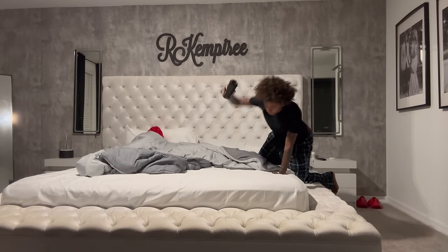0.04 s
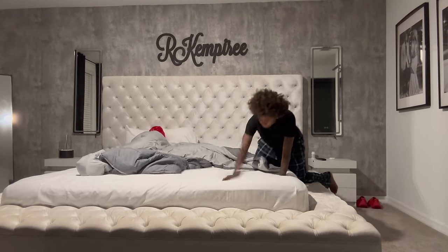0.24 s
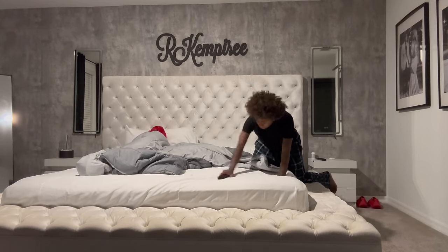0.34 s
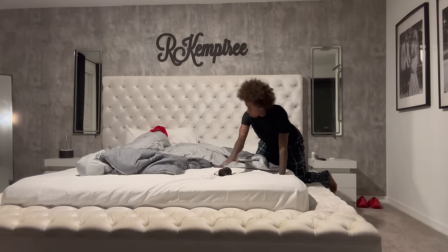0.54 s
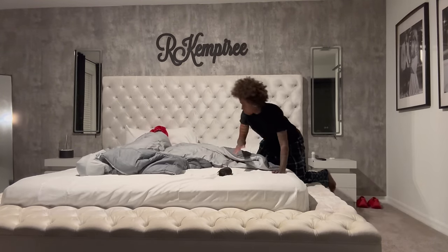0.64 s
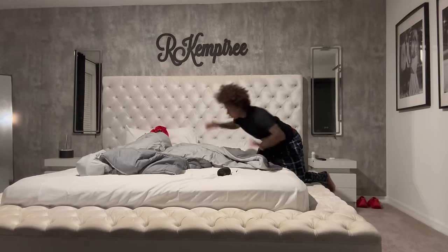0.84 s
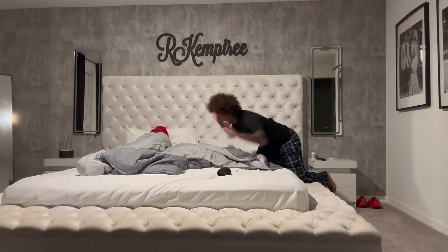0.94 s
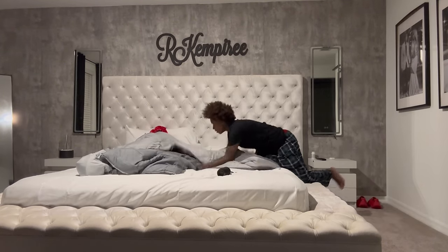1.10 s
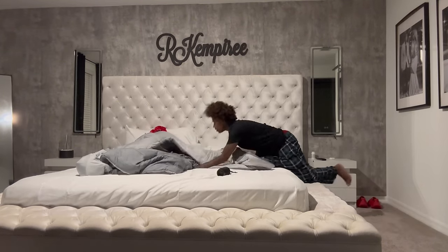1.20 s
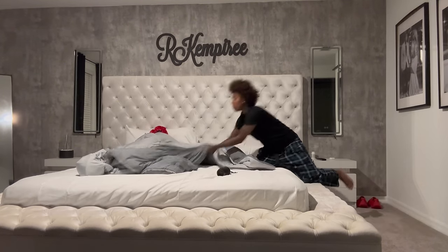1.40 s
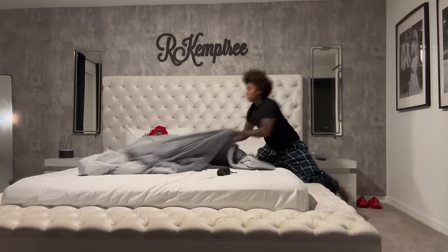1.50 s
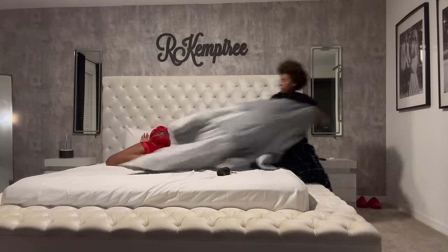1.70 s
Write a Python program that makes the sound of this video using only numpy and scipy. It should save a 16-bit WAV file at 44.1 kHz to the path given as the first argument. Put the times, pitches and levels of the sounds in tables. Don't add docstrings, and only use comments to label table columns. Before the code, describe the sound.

A small hard object slams onto a mattress with a loud low boom and puff of air, then a softer hand slap and knee thuds, then a comforter rustles as it is pulled, in a quiet bedroom, phone microphone.

```python
import sys
import numpy as np
from scipy import signal
from scipy.fft import rfft, irfft, next_fast_len
from scipy.io import wavfile
from scipy.ndimage import uniform_filter1d

SR = 44100
rng = np.random.default_rng(int(sys.argv[2]) if len(sys.argv) > 2 else 0)


def decibels_to_gain(level_db):
    exponent = np.asarray(level_db, float) / 20
    return 10 ** exponent


def materialize(psi):
    bounded = np.clip(np.atleast_2d(psi).T, -1, 1)
    quanta = np.round(bounded * 32767).astype(np.int16)
    wavfile.write(sys.argv[1], SR, quanta)


N = 77175


def evened(x):
    return x / np.sqrt(np.mean(x ** 2) + 1e-20)


def read(points, hz):
    f, value = np.transpose(points)
    return np.interp(np.log(hz + 1), np.log(f + 1), value)


def steady(t, hz):
    return 1


def noise(colour, level, tilt_db=0., patchy_db=2.5):
    frames, hz = N // 64 + 5, np.fft.rfftfreq(256, 1 / SR)[:, None]
    a, b, patches = rng.standard_normal((frames, 129, 2, 3)).T
    patches = uniform_filter1d(patches[0], size=4, axis=0)
    patches = evened(uniform_filter1d(patches, size=14, axis=1))
    t = np.arange(frames) * 64 / SR
    z = (a + 1j * b) * decibels_to_gain(patchy_db * patches) * level(t, hz)
    x = signal.istft(z, nperseg=256, noverlap=192)[1][:, :N] / np.sqrt(96)
    fine = np.fft.rfftfreq(N, 1 / SR)
    tilt = tilt_db * np.log2(np.clip(fine, 400, None) / 1000)
    shape = decibels_to_gain(read(colour, fine) + tilt)
    return irfft(rfft(x) * evened(shape), N)


# (frequency [Hz], level [dB])
HUSH_COLOUR = [(25, -11.5), (60, -7), (110, -15), (220, -23.5), (330, -21.5), (900, -32.5), (2500, -39.5),
               (15800, -60)]


def hush():
    return decibels_to_gain(-57) * noise(HUSH_COLOUR, steady, patchy_db=0.5)


# (frequency [Hz], level [dB])
CLOTH_COLOUR = [(50, -25.5), (130, -3.5), (480, -5.5), (900, -13), (1600, -15.5), (2700, -27.5),
                (8000, -28), (15800, -41.5)]
# (time [s], level [dB], rise [s], time to fall 60 dB [s], tilt [dB/octave])
FLICKS = [(-.02, -63.5, .01, 0.73, 1.5), (0.072, -51.5, 0.0011, 0.3, 1), (.125, -69, 0.0049, 0.093, -4),
          (0.172, -60, 0.073, 0.22, 1.5), (0.227, -36, .008, .1, 7.5), (0.411, -58.5, 0.023, 0.44, -0.5),
          (.49, -54, .02, 0.22, -1.5), (.984, -67.5, 0.0017, 0.91, 4), (1.034, -47, 0.0028, 0.082, -2),
          (1.301, -50.5, 0.012, .3, 1), (1.322, -43, 0.0087, 0.26, -1), (1.61, -47, 0.034, 0.17, 1.5),
          (1.73, -69.5, .015, .2, -1.5)]
# (time [s], level [dB])
DRAG = [
    (1.34, -71),
    (1.4, -64),
    (1.51, -54),
    (1.604, -53),
    (1.622, -52),
    (1.674, -57),
    (1.75, -57.5),
]


def cloth():
    t = np.arange(N) / SR
    grains_per_s, grain_db, grain_share = 340, -2.5, 0.13
    grains = decibels_to_gain(grain_db * rng.exponential(1, N)) * (rng.random(N) < grains_per_s / SR)
    grains = signal.oaconvolve(grains, np.exp(-np.arange(200) / 40))[:N]
    rough = 1 - grain_share + grain_share * evened(grains)

    s, db = np.transpose(DRAG)
    fade_in = np.clip((t - s[0]) / 0.0526, 0, 1)
    out = decibels_to_gain(np.interp(t, s, db) + 8.5) * fade_in * noise(CLOTH_COLOUR, steady)

    dull = evened(noise(CLOTH_COLOUR, steady, tilt_db=-1.))
    bright = evened(noise(CLOTH_COLOUR, steady, tilt_db=4.))
    for start, db, rise, t60, tilt in FLICKS:
        u = np.maximum(t - start, 0)
        share = np.clip((tilt + 1) / 5, 0, 1)
        shape = np.minimum(u / rise, 1) * decibels_to_gain(db - 60 * np.maximum(u - rise, 0) / t60)
        out = out + shape * ((1 - share) * dull + share * bright)
    return rough * out


# (time [s], frequency [Hz], length [s])
SEAMS = [(.074, 7800, .012), (.075, 1200, .016), (.088, 4200, .014), (.125, 1350, .03), (.66, 340, .28),
         (1.305, 3900, .045), (1.328, 2200, .02), (1.47, 3750, .11), (1.495, 2200, .07), (1.5, 1500, .07),
         (1.615, 1400, .03)]
SEAM_LEVELS = [-63.5, -57.5, -66, -57, -61, -63.5, -59, -62, -56.5, -56, -55.5]


def seams():
    t, out = np.arange(N) / SR, np.zeros((2, N))
    width_hz = 260
    r = np.exp(-np.pi * width_hz / SR)
    for (start, hz, length), db in zip(SEAMS, SEAM_LEVELS):
        hiss = rng.standard_normal((2, N)) + 1j * rng.standard_normal((2, N))
        slow = signal.lfilter([1], [1, -2 * r, r * r], hiss)
        whistle = (slow * np.exp(2j * np.pi * hz * t)).real
        arch = np.sin(np.pi * np.clip((t - start) / length, 0, 1) ** .5)
        out += decibels_to_gain(db) * arch * evened(whistle)
    return out


def struck(hits, modes, contact_s):
    t, out = np.arange(SR // 2) / SR, np.zeros(N + 2 * SR)
    settle_db, settle_s = -10, 0.018
    push = np.hanning(int(contact_s * SR) + 3)
    fade = np.exp(-t[:SR // 8] / settle_s) * decibels_to_gain(settle_db) / np.sqrt(settle_s * SR / 2)
    shiver = rng.standard_normal((len(hits), SR // 8)) * fade
    shiver[:, 0] = 1
    for (s, db, *pitch), drive in zip(hits, shiver):
        factor = pitch[0] if pitch else 1
        ring = np.zeros(len(t))
        for k, (hz, level_db, t60) in enumerate(modes):
            tone = decibels_to_gain(level_db - 60 * t / t60) * np.sin(2 * np.pi * hz * factor * t)
            ring += (-1) ** k * tone
        ring = signal.fftconvolve(np.convolve(ring, push / push.sum()), drive)
        out[round(s * SR):][:len(ring)] += decibels_to_gain(db) * ring
    return out[:N]


# (frequency [Hz], time to fall 60 dB [s])
ROOM = [(60, 0.57), (200, 0.35), (500, 0.36), (1000, 0.36), (2000, 0.4), (5000, 0.39), (11000, 0.37)]


def dying(t, hz):
    return decibels_to_gain(-60 * t / read(ROOM, hz))


def burst(start, db, rise_s, colour, crack_db):
    def level(t, hz):
        u = np.maximum(t - start, 0)
        crack = 1 + decibels_to_gain(crack_db) * np.exp(-u / 0.036)
        return (t > start - .02) * dying(u, hz) * crack
    gate = np.clip((np.arange(N) / SR - start) / rise_s, 0, 1)
    return decibels_to_gain(db) * gate * noise(colour, level)


# (time [s], level [dB])
SLAM = [
    (0.2385, -4),
    (0.2445, 5),
    (0.2555, -15.5),
]
# (frequency [Hz], level [dB], time to fall 60 dB [s])
BED = [(45.7, -15, .5), (66.3, -10, .4), (86.6, 3, 0.14), (119.4, -17.5, 0.19), (142.17, -9.5, .5),
       (205, -3, 0.12), (302.5, -3.5, 0.11), (359.4, -17.5, 0.23), (506.5, -11.5, 0.29), (583, 0.5, 0.069),
       (711, -6.5, 0.09), (762, 1.5, .12), (823, -18.5, 0.2), (1318, -9, 0.067)]
# (frequency [Hz], level [dB])
SLAM_AIR = [(40, -5), (90, -0.5), (700, -16), (1000, -24.5), (1400, -22.5), (4000, -36), (9000, -44.5),
            (15800, -70.5)]


def slam():
    boom = decibels_to_gain(-12) * struck(SLAM, BED, contact_s=0.0004)
    puff = burst(SLAM[0][0], -14.5, 0.00067, SLAM_AIR, crack_db=1)
    return boom, puff


def room(x):
    taps = np.zeros((2, SR // 2))
    slots = np.arange(160, SR // 2 - 20, 20)
    at = slots + rng.integers(0, 20, (2, len(slots)))
    np.put_along_axis(taps, at, rng.choice([-1., 1.], at.shape), 1)
    hz, t, z = signal.stft(taps, SR, nperseg=512)
    tail = signal.istft(z * dying(t, hz[:, None]), SR, nperseg=512)[1]
    return signal.fftconvolve(x[None], tail / np.linalg.norm(tail[0]), axes=1)[:, :N]


# (time [s], level [dB], pitch factor [ratio])
KNEES = [(.43, -33.5, 0.94), (.5, -48.5, 1.213), (.692, -44, 1.24), (.722, -48, 0.936), (.785, -55, 1.13),
         (.93, -56, 1.06), (1.078, -17, 1), (1.103, -22, 1), (1.15, -22, 0.785), (1.19, -37.5, 0.81),
         (1.255, -52, 0.89), (1.345, -37, 1.2), (1.4, -40, 1), (1.5, -40.5, 1.06), (1.62, -34, 0.91),
         (1.664, -25.5, 0.81), (1.685, -28, 0.83), (1.727, -48, 0.39)]
# (frequency [Hz], level [dB], time to fall 60 dB [s])
SPRINGS = [(42, -9.5, 0.22), (82.1, 4, 0.065), (118.5, -5, 0.065)]


def knees():
    return struck(KNEES, SPRINGS, contact_s=0.004)


# (time [s], level [dB])
SLAP = [
    (1.036, -13.5),
    (1.0445, -2.5),
    (1.049, 1),
    (1.056, 0),
    (1.095, -4),
]
# (frequency [Hz], level [dB], time to fall 60 dB [s])
PALM = [(277, 3, 0.034), (361, -3, 0.25), (429, -12, 0.17), (590, 0.5, 0.027), (897, -16.5, 0.11),
        (1272, -4.5, 0.037), (1466, -5, 0.032)]
# (frequency [Hz], level [dB])
SLAP_AIR = [(80, -44), (200, -27), (310, 0.5), (1000, -10.5), (1600, -17.5), (4500, -33.5), (9000, -38.5),
            (15800, -53)]


def slap():
    knock = decibels_to_gain(-25) * struck(SLAP, PALM, contact_s=0.0004)
    puff = burst(SLAP[1][0] - .001, -27.5, 0.0014, SLAP_AIR, crack_db=-20)
    return knock, puff


# (frequency [Hz], angle [rad])
PORTS = [(60, 0.16), (250, .32), (1500, 0.78), (8500, 0.65)]
# (frequency [Hz], angle [rad])
TREBLE_ANGLES = [(9300, 1.5), (10100, 1.64), (11100, 3.05), (13200, 3.24), (13950, 4.6)]


def ports(mix):
    low_cut_hz, top_hz, lean_db = 36, 15800, 1.4
    mix = signal.sosfilt(signal.butter(2, low_cut_hz, 'high', fs=SR, output='sos'), mix)
    hz = np.fft.rfftfreq(2 * N, 1 / SR)
    angle = read(PORTS + TREBLE_ANGLES, hz)
    gain = np.abs([np.cos(angle), np.sin(angle)]) * np.where(hz < top_hz, 1, .3)
    mirrored = np.hstack([mix, mix[:, ::-1]])
    mid, side = irfft(rfft(mirrored) * gain)[:, :N]
    return np.array([mid + side, mid - side]) * decibels_to_gain(np.array([[lean_db / 2], [-lean_db / 2]]))


def scene():
    boom, slam_puff = slam()
    knock, slap_puff = slap()
    knocks = boom + knock + knees()
    turned = signal.hilbert(knocks, next_fast_len(N)).imag[:N]
    mix = np.array([knocks, .15 * knocks + .4 * turned])
    mix += decibels_to_gain(-9.5) * room(knocks) * np.array([[1], [1.1]])
    mix += slam_puff + slap_puff
    mix += cloth() + seams() + hush()
    return ports(mix)


def band_limit(x):
    return signal.sosfilt(signal.butter(12, 16860, fs=SR, output="sos"), x)


def record(dry):
    knee = 1.05
    mix = knee * np.tanh(dry / knee)
    return band_limit(mix)


dry = scene()
out = record(dry)
materialize(out)
```